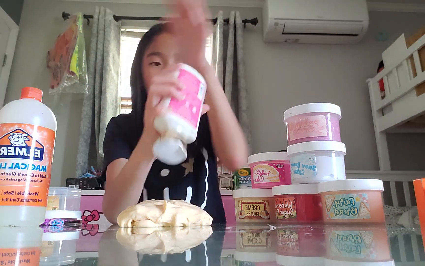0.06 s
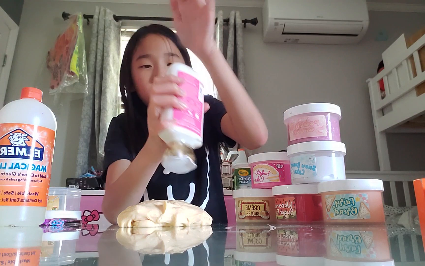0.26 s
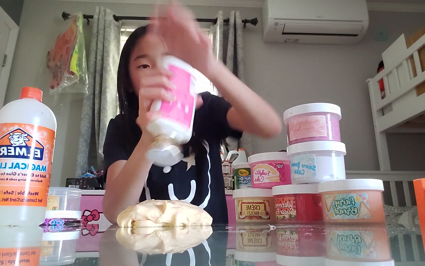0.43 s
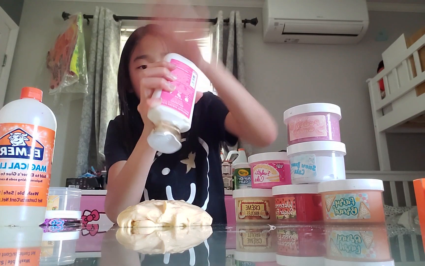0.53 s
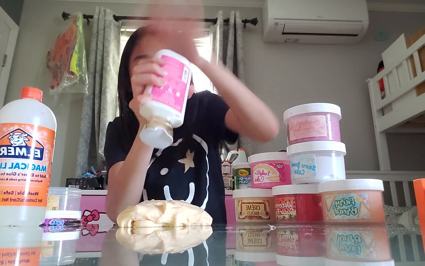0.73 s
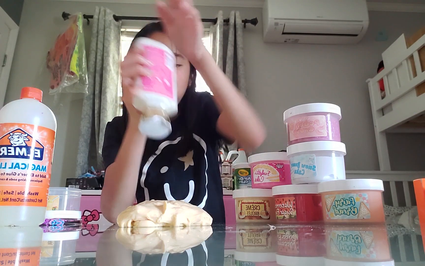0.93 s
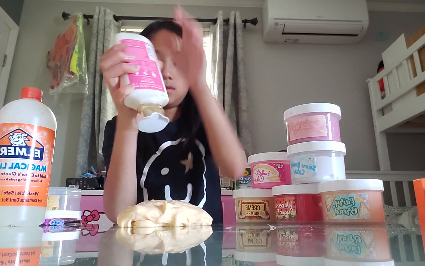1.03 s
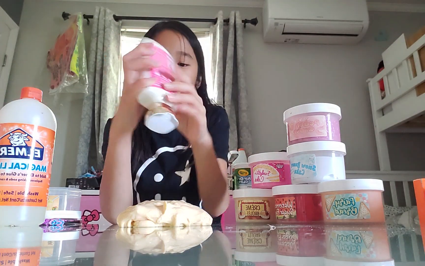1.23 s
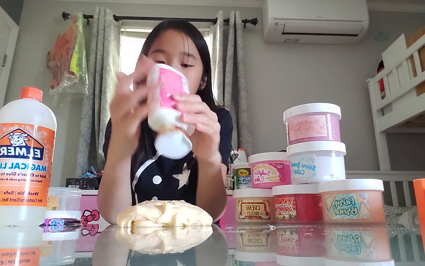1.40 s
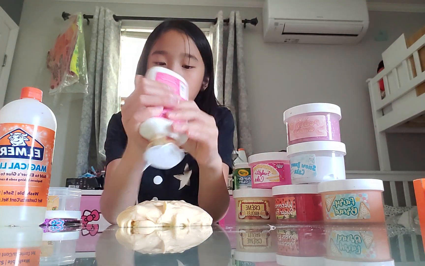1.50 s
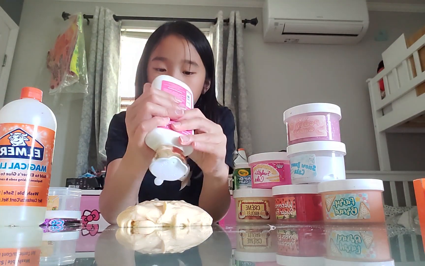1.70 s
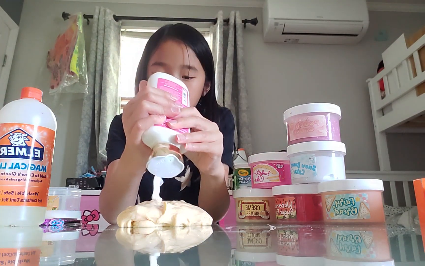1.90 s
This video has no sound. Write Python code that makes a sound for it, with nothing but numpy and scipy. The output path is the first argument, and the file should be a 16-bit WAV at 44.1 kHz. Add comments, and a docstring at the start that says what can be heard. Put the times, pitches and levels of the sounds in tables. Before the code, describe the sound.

Four quick, sharp slaps of a hand on a plastic bottle ring briefly in a small bedroom. Quiet finger clicks and a faint squeeze follow, over low bumps from the table holding the nearby microphone.

```python
"""Four sharp smacks sound in a small bedroom as a palm strikes the base of an upturned plastic bottle.
Each is a pop of trapped air and a crack of skin on plastic, followed by the room's reverberation.
The arm shakes the glass table under the microphone, which thumps and shudders. Then the fingers
shift, tick on the bottle and squeeze it until its wall snaps in, over a dull rustle of sleeve."""
import sys
import numpy as np
from scipy import signal
from scipy.fft import rfft, irfft
from scipy.io import wavfile
from scipy.ndimage import uniform_filter1d, minimum_filter1d

SR = 44100
rng = np.random.default_rng(int(sys.argv[2]) if len(sys.argv) > 2 else 0)


def wav_out(sig):
    """Save sig, one row per channel (or a flat mono array), as 16-bit PCM at SR to the path in sys.argv[1]."""
    wavfile.write(sys.argv[1], SR, np.round(np.clip(np.atleast_2d(sig).T, -1, 1) * 32767).astype(np.int16))


N = 85995
T = np.arange(N) / SR


def smacks():
    """Impact excitation: each blow compresses trapped air, flexes the base and rings the wall's modes."""
    # Each row: start in seconds; pop level in dB, pitch in Hz and rise in seconds; crack level in dB,
    # centre and top in Hz; sizzle in dB; smear in seconds; wall ring, flex and room levels in dB.
    blows = [(0.2042, -1, 593, 0.00068, 7, 4630, 11500, -23, 0.00045, -7.5, -12, -6.5),
             (0.4326, -15, 593, 0.00055, -0.5, 2800, 8200, -21, 0.000075, -21.5, -20, 4.5),
             (0.634, -2.5, 540, 0.00087, -0.5, 4420, 6000, -15, 0.00028, -6.5, -34.5, -5),
             (0.8406, 4, 610, 0.0006, -2.5, 2900, 10000, -14, 0.00043, -5.5, -24.5, -5.5)]
    # Modes of the bottle wall. Each row: frequency in Hz, level in dB, 60 dB decay time in seconds.
    wall_modes = [(900, -2, 0.003), (1134, -3, 0.0083), (1514, 1, 0.0071), (2183, -1, 0.0042),
                  (2746, -5.5, .006), (3810, -7.5, 0.01), (4700, -8.5, 0.0034), (5500, -17.5, 0.015),
                  (8056, -14, 0.0022)]
    wall = butterworth(ring(wall_modes), 640, "high")
    pop_lead_s = 0.00031
    out = 0
    for (start, pop_db, pop_hz, pop_rise_s, crack_db, centre_hz, top_hz,
         sizzle_db, smear_s, wall_db, flex_db, room_db) in blows:
        crack, buzz = amp(crack_db) * skin_contact(start, centre_hz, top_hz, sizzle_db, smear_s)
        pop = amp(pop_db) * pressure_pulse(pop_hz, pop_rise_s)
        flex = amp(flex_db) * pressure_pulse(hz=319, rise_s=0.0013)
        body = butterworth(pop + flex, 250, "high", order=3)
        thock = amp(wall_db) * delay(wall, start) - delay(body, start - pop_lead_s)
        direct = butterworth(crack + buzz + thock, 11700, "low", order=3)  # the hand shades the treble
        # The bottle moves, so each smack meets the room a little differently.
        reverberation = room(crack) + amp(1) * room(thock)
        out = out + microphone(direct) + amp(room_db) * reverberation
    return out


def pressure_pulse(hz, rise_s):
    """Damped oscillation: a few cycles swell and die as air or plastic is pressed and let go."""
    return np.sin(2 * np.pi * hz * T) * T / rise_s * np.exp(1 - np.minimum(T / rise_s, 60))


def skin_contact(start, centre_hz, top_hz, sizzle_db, smear_s):
    """Brief contacts are broadband: the palm's crack and a faint buzz share one broad resonance."""
    lead_s, touch_rise_s = 0.0032, 0.001  # the fingers land just ahead of the palm
    rattle = amp(-31.5) * delay(burst(decay_s=0.0036), start)  # the wall buzzes briefly
    touch = burst(decay_s=lead_s) * (1 - np.exp(-T / touch_rise_s))
    buzz = rattle + amp(-31) * delay(touch, start - lead_s)
    crack = delay(smeared_click(smear_s), start)
    skin = butterworth(np.array([crack, buzz]), 1000, "high")
    skin = skin + amp(12) * resonate(skin, centre_hz, width_hz=1600)
    sizzle = amp(sizzle_db) * butterworth(skin, top_hz, "high", order=5)
    return butterworth(skin, top_hz, "low", order=5) + sizzle


def smeared_click(smear_s, scatter=0.33):
    """Dispersion: four all-pass delays spread one click in time, as the contact patch does."""
    click = signal.unit_impulse(N) + 1e-18
    for lag_s in smear_s * np.geomspace(0.18, 1, 4):
        feedback = np.r_[1, np.zeros(int(lag_s * SR)), scatter]
        click = signal.lfilter(feedback[::-1], feedback, click)
    return click


def finger_contacts():
    """Impact and friction: fingers tick on the plastic, each tap over a low knock, and slide on it."""
    # Each row: start in seconds, tick level in dB, decay time in seconds, knock level in dB.
    taps = [(0.7575, -38, 0.004, -50), (0.773, -39.5, 0.006, -61), (0.790, -42.5, 0.01, -77),
            (0.995, -42, 0.0011, -66.5), (1.043, -55, .001, -66), (1.284, -58, .001, -76),
            (1.3002, -48, .003, -64), (1.313, -56, 0.0024, -48.5), (1.337, -54, 0.0049, -43.5),
            (1.370, -49, 0.002, -58), (1.406, -43, 0.0019, -51.5), (1.41, -42, .002, -70),
            (1.415, -47, 0.0015, -73), (1.43, -48, 0.00084, -60), (1.537, -44.5, 0.0044, -48),
            (1.556, -52, .005, -80), (1.665, -51, .0015, -66), (1.702, -55, 0.0025, -75),
            (1.735, -51, 0.00095, -48.5)]
    # Low knocks under the taps: the table's ring near 142 Hz and the bottle's low modes.
    # Each row: frequency in Hz, level in dB, 60 dB decay time in seconds.
    knock_modes = [(142, -6, .12), (255, -0.5, 0.096), (330, 1.5, 0.024), (590, 0, .025)]
    # Friction as the fingers slide to a new grip. Each row: time in seconds, level in dB.
    slide_levels = [(1.27, -92), (1.31, -63), (1.35, -62), (1.385, -72), (1.41, -57.5), (1.46, -78),
                    (1.5, -83)]
    # Spectrum of skin on plastic. Each row: frequency in Hz, gain in dB.
    contact_spectrum = [(300, -5), (1000, 1), (3000, -1.5), (7000, 2), (10000, -5), (12000, -13),
                        (16000, -18)]
    ticks = sum(amp(db) * delay(burst(decay_s), start) for start, db, decay_s, _ in taps)
    knock = ring(knock_modes)
    knocks = sum(amp(db) * delay(knock, start) for start, _, _, db in taps)
    slide = envelope(slide_levels) * rng.standard_normal(N)
    return colour(ticks + slide, contact_spectrum) + knocks


def wall_snap():
    """Buckling: the squeezed wall snaps in and rings in its high modes."""
    # Each row: frequency in Hz, relative level in dB, 60 dB decay time in seconds.
    snap_modes = [(1380, -7.5, 0.0067), (2600, -6, .008), (3750, -3.5, .007), (4570, 3.5, 0.014),
                  (4840, -23, .013), (7010, -14, 0.0044), (10200, -15, 0.0061), (13000, -17, .004)]
    return amp(-38.5) * delay(ring(snap_modes), seconds=1.6195)


def squeeze():
    """Friction noise: rubbing skin drives a resonance that climbs with pressure, and a lighter hiss."""
    # Each row: time in seconds, level in dB.
    rub_levels = [(1.48, -84), (1.54, -65.5), (1.6, -63), (1.68, -66), (1.74, -65), (1.77, -76.5),
                  (1.85, -79.5)]
    # Resonances of the hiss. Each row: frequency in Hz, bandwidth in Hz, relative level in dB.
    hiss_peaks = [(3140, 840, 5), (4765, 420, -5.5), (7960, 900, -5.5)]
    start_hz, climb_hz_per_s, width_hz = 1700, 1150, 170
    hiss = unit(sum(amp(db) * resonate(rng.standard_normal(N), hz, width) for hz, width, db in hiss_peaks))
    pressed_s = np.maximum(T - rub_levels[0][0], 0)
    phase = 2 * np.pi * np.cumsum(start_hz + climb_hz_per_s * pressed_s) / SR
    in_phase, quadrature = butterworth(rng.standard_normal((2, N)), width_hz / 2, "low", order=1)
    rub = unit(in_phase * np.cos(phase) + quadrature * np.sin(phase))
    return envelope(rub_levels) * (amp(-2) * hiss + amp(1) * rub)


def glass_table():
    """Structure-borne sound: knocks sag in pitch to the table's low mode, which the moving arm shakes."""
    # Each row: start in seconds, level in dB, starting frequency in Hz, 60 dB decay time in seconds.
    thumps = [(0.140, -36.5, 163, 0.1), (0.165, -24.5, 194, 0.038), (0.208, -20.5, 91.7, 0.19),
              (0.441, -26, 101, 0.21), (0.643, -20, 104, 0.14), (0.852, -22, 82, 0.31),
              (1.094, -23.5, 79.7, 0.32), (1.402, -13.5, 130, 0.11), (1.441, -28.5, 184, 0.058),
              (1.541, -42, 210, 0.05)]
    # Shudder under the arm. Each row: time in seconds, level in dB.
    shudder_levels = [(0, -88), (.07, -53.5), (.15, -46), (.3, -39), (.36, -61), (.42, -50), (.55, -41),
                      (.61, -60), (.72, -40), (.8, -48), (.95, -34.5), (1.02, -59), (1.07, -54),
                      (1.17, -34.5), (1.24, -60.5), (1.34, -63.5), (1.55, -40), (1.64, -61.5), (1.77, -45),
                      (1.86, -48.5), (1.95, -60)]
    mode_hz, sag_s, rise_s = 57, 0.022, 0.0056
    out = envelope(shudder_levels) * np.sqrt(2) * np.sin(2 * np.pi * mode_hz * T)
    for start, db, start_hz, t60 in thumps:
        hz = mode_hz + (start_hz - mode_hz) * np.exp(-T / sag_s)
        thump = np.sin(2 * np.pi * np.cumsum(hz) / SR) * decay(t60) * (1 - np.exp(-T / rise_s))
        out = out - amp(db) * delay(thump, start)
    return butterworth(out, 35, "high", order=3) * balance(right_db=-8.5)


def sleeve():
    """Cloth friction: a dull noise rises and falls with the arm's movement."""
    # Each row: time in seconds, level in dB.
    rustle_levels = [(0, -59.5), (.08, -59), (.18, -62.5), (.3, -96), (.41, -52.5), (.6, -63), (1.1, -79.5),
                     (1.28, -88), (1.33, -53), (1.43, -58), (1.5, -72), (1.75, -67.5), (1.95, -67.5)]
    # Each row: frequency in Hz, relative level in dB.
    cloth_spectrum = [(60, -27), (140, -10), (290, 1), (450, -4), (900, -14.5), (2000, -31), (8000, -46.5)]
    rustle = unit(colour(rng.standard_normal(N), cloth_spectrum))
    return envelope(rustle_levels) * rustle * balance(right_db=-4)


def room(x):
    """Reverberation: early reflections, standing waves and a diffuse tail absorbed band by band."""
    # Diffuse field. Each row: frequency in Hz, relative spectral level in dB,
    # 60 dB decay time in seconds, right-side gain in dB.
    diffuse = [(100, 10.5, 0.58, -4), (180, 1, 0.17, -4), (394, -2.5, 0.26, -2.5), (704, -5, 0.23, -8.5),
               (1230, -1, .29, -7.5), (2500, -2, 0.3, -5.5), (5060, -2, 0.29, -7.5), (9100, -0.5, .29, -8),
               (16000, -5.5, .24, -0.5)]
    # Each row: frequency in Hz, level in dB, 60 dB decay time in seconds.
    standing_waves = [(154, -58.5, 0.41), (225.4, -55, .2), (260.6, -47.5, 0.21), (329, -57.5, 0.12),
                      (450.7, -59, 0.3), (525.7, -55, 0.28), (581, -59.5, 0.17), (725, -62, .22)]
    # Reflections from table and walls. Each row: delay in seconds, gain in dB.
    reflections = [(.0043, -22), (.0097, -21), (.021, -21.5)]
    length, rise_s, diffuse_db = SR // 2, 0.01, -1.5
    t = T[:length]
    rise = 1 - np.exp(-t / rise_s)
    edges_hz = np.geomspace(80, 18000, 17)
    white = rng.standard_normal((2, 2, length))
    tail = np.zeros((2, length))
    for k, (low, high) in enumerate(zip(edges_hz, edges_hz[1:])):
        hz = np.sqrt(low * high)
        mid, side = butterworth(white[k % 2], [low, high], "band")
        coherence = 1 / (1 + (hz / 1100) ** 2)  # long waves reach both sides alike
        band = np.sqrt(1 + coherence) * mid + np.sqrt(1 - coherence) * side * [[1], [-1]]
        band *= np.exp(-np.log(1000) * t / at_hz(diffuse, hz, column=2)) * rise
        band *= np.sqrt(2 * (high - low) / SR / np.sum(band ** 2, axis=1, keepdims=True))  # unity gain
        tail += band * amp(diffuse_db + at_hz(diffuse, hz)) * balance(at_hz(diffuse, hz, column=3))
    tail += ring(standing_waves)[:length] * rise * balance(right_db=-2)
    early = sum(amp(db) * delay(x, lag_s) for lag_s, db in reflections)
    return signal.fftconvolve(tail, x[None], axes=1)[:, :N] + microphone(early)


def room_noise():
    """Ambient noise, coherent between the sides in the bass; a faint tail dies away at the start."""
    # Each row: frequency in Hz, relative spectral level in dB.
    noise_spectrum = [(30, -6.5), (60, 11), (110, -6), (250, -5), (550, -5), (1000, -18.5), (2000, -33),
                      (5000, -35), (10000, -36.5), (16000, -49.5)]
    steady_db, tail_db, fall_db_per_s = -59, -63, 93.5
    bass = butterworth(rng.standard_normal(N), 900, "low", order=1)
    trebles = butterworth(rng.standard_normal((2, N)), 600, "high", order=1)
    steady = np.array([unit(colour(bass + treble, noise_spectrum)) for treble in trebles])
    tail = unit(butterworth(rng.standard_normal((2, N)), 5000, "low"))
    return (amp(steady_db) * steady + amp(tail_db - fall_db_per_s * T) * tail) * balance(right_db=-6)


def microphone(x):
    """Acoustic shadow: the left port faces the bottle; the right hears it later, softer and duller."""
    shadowed = amp(-11) * butterworth(x, 910, "low", order=1) + amp(-18.5) * x
    return np.array([x, delay(shadowed, seconds=0.00012)])


def ring(modes):
    """Modal superposition: a struck body sounds as a sum of damped sinusoids."""
    return sum(amp(db) * decay(t60) * np.sin(2 * np.pi * hz * T) for hz, db, t60 in modes)


def burst(decay_s):
    """Contact noise: a dying run of tiny random impulses."""
    return rng.choice([-1., 1.], N) * np.exp(-np.minimum(T / decay_s, 60))


def decay(t60):
    """Exponential damping by 60 dB in t60 seconds."""
    return np.exp(-np.minimum(np.log(1000) * T / t60, 60))


def envelope(curve):
    """Gain along a curve of seconds and dB, silent outside it."""
    return amp(np.interp(T, *np.transpose(curve), left=-120, right=-120))


def resonate(x, hz, width_hz):
    """Two-pole resonance with unity gain at its peak."""
    radius = np.exp(-np.pi * width_hz / SR)
    feedback = [1, -2 * radius * np.cos(2 * np.pi * hz / SR), radius ** 2]
    return signal.lfilter(np.array([1, 0, -1]) * (1 - radius ** 2) / 2, feedback, x + 1e-18)


def butterworth(x, hz, kind, order=2):
    """Filter with a maximally flat passband."""
    return signal.sosfilt(signal.butter(order, hz, kind, fs=SR, output="sos"), x + 1e-18)


def colour(x, spectrum):
    """Spectral shaping by a curve of Hz and dB."""
    hz = np.maximum(np.fft.rfftfreq(2 * N, 1 / SR), 1)
    return irfft(rfft(x, 2 * N) * amp(at_hz(spectrum, hz)))[:N]


def at_hz(rows, hz, column=1):
    """Interpolate one column on a logarithmic frequency axis."""
    rows = np.array(rows)
    return np.interp(np.log(hz), np.log(rows[:, 0]), rows[:, column])


def delay(x, seconds):
    """The same sound, later."""
    return np.r_[np.zeros(round(seconds * SR)), x][:N]


def balance(right_db):
    """Stereo gains, with the left at unity."""
    return amp([[0], [right_db]])


def amp(db):
    """Decibels to amplitude ratio."""
    return 10 ** (np.asarray(db) / 20)


def unit(x):
    """Scale to an rms of 1."""
    return x / np.sqrt(np.mean(x ** 2) + 1e-20)


def scene():
    """Superposition: bottle, hands and sleeve add to the table's rumble and the room's noise."""
    fingers = finger_contacts() + wall_snap() + squeeze()
    rustle = sleeve()
    bottle = smacks() + microphone(fingers) + amp(-5.5) * room(fingers)
    return bottle + rustle + glass_table() + room_noise()


def record(dry):
    """Limiting and saturation: peaks are held, what passes overloads, and the highest treble is cut."""
    limit, reaction_s = amp(2.5), 0.00044
    x = signal.sosfilt(signal.cheby2(14, 60, 16700, fs=SR, output="sos"), dry)
    window = 2 * int(reaction_s * SR) + 1
    gain = limit / np.maximum(np.abs(x), limit)
    x = x * uniform_filter1d(minimum_filter1d(gain, window), window)
    x = x / (1 + x ** 6) ** (1 / 6)  # soft clipping at full scale
    return signal.sosfilt(signal.cheby2(14, 60, 17000, fs=SR, output="sos"), x)


dry = scene()
out = record(dry)
wav_out(out)
```